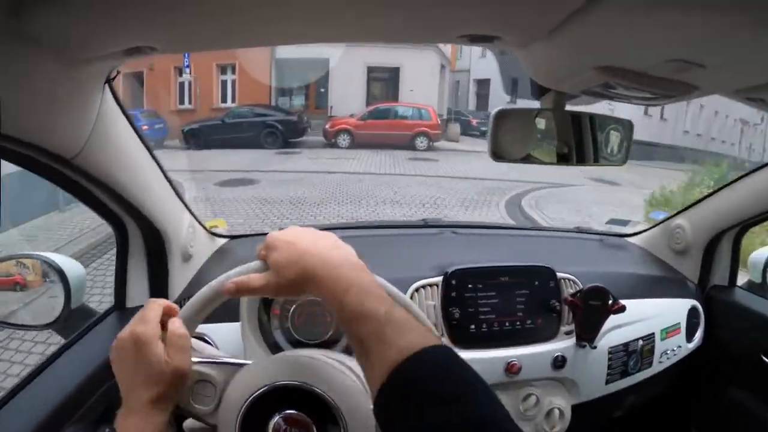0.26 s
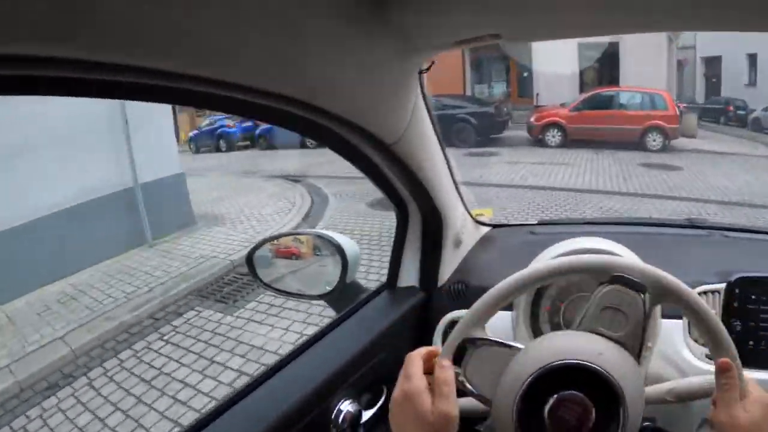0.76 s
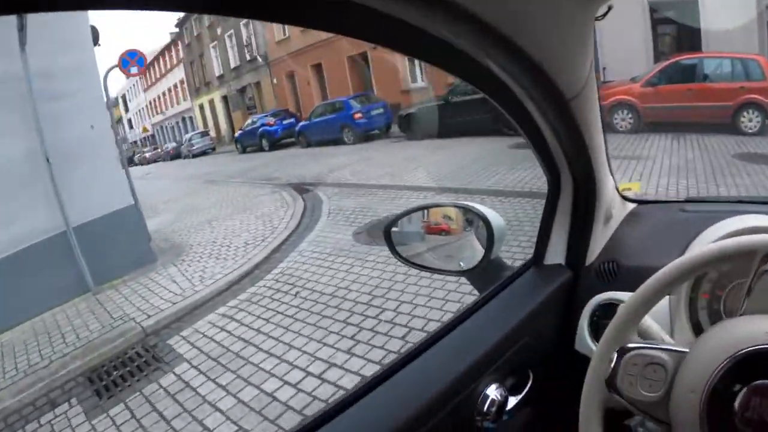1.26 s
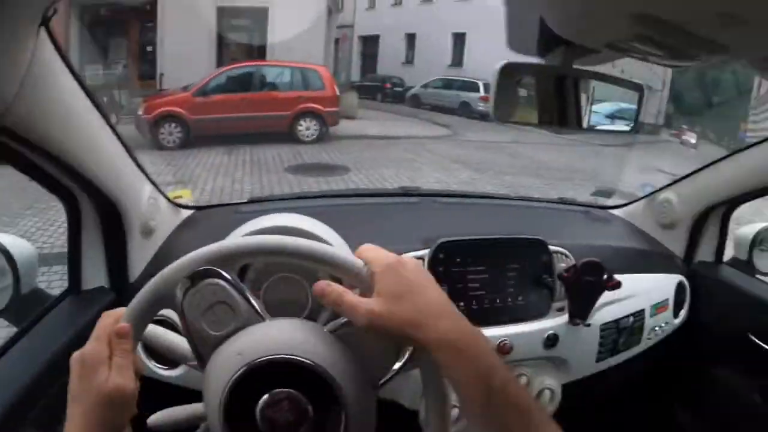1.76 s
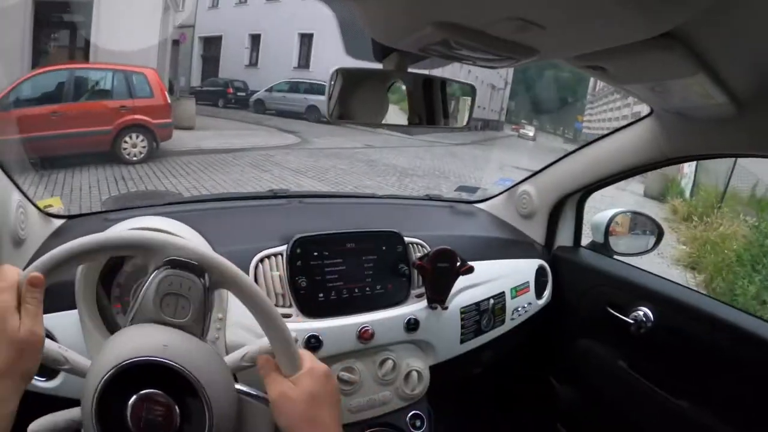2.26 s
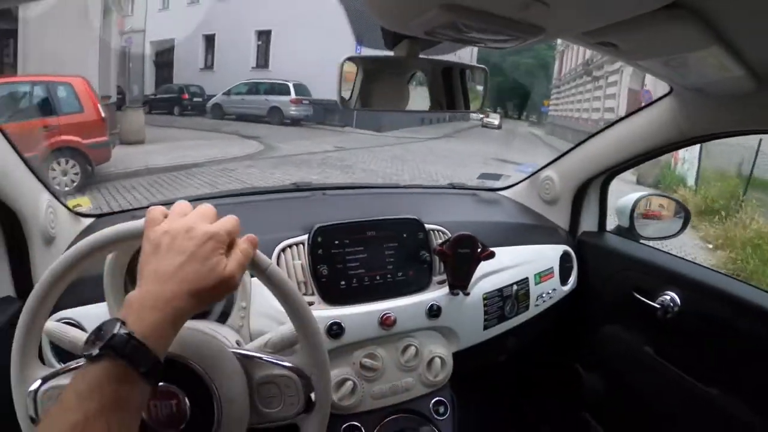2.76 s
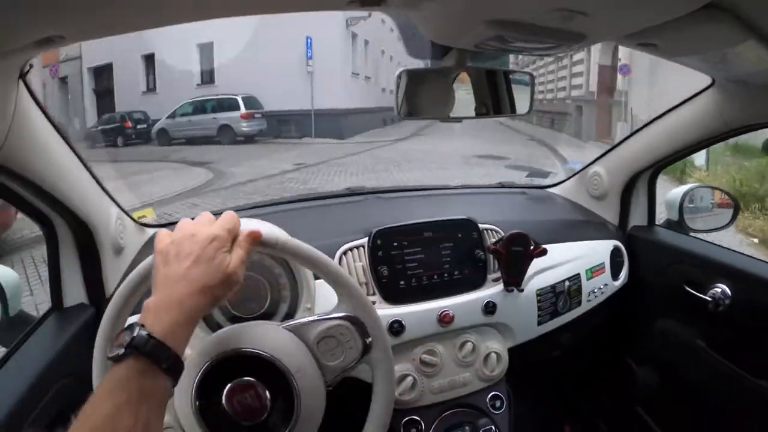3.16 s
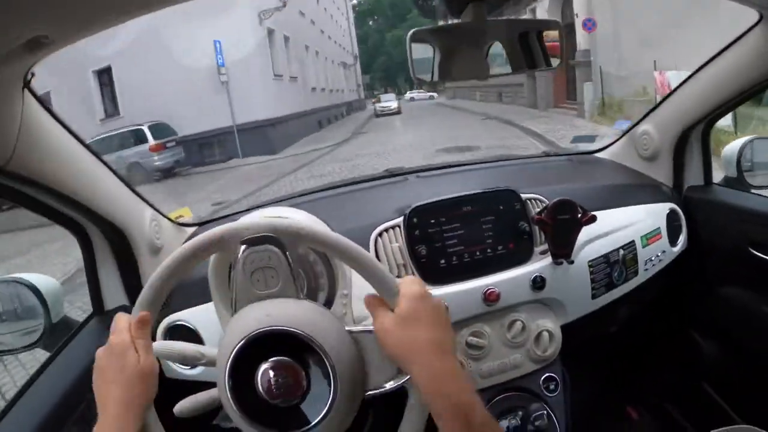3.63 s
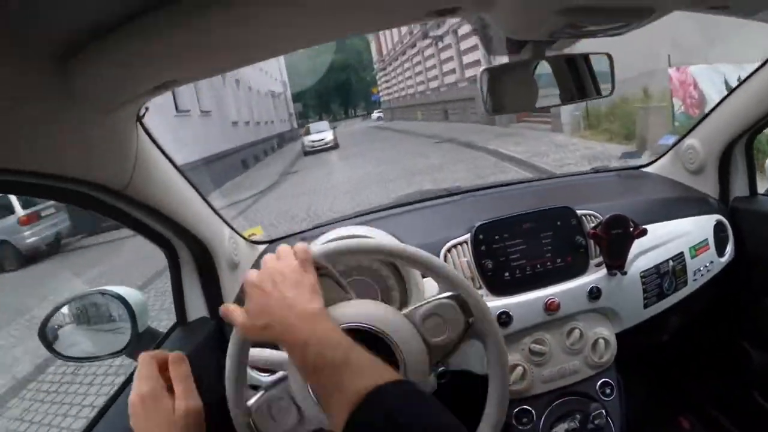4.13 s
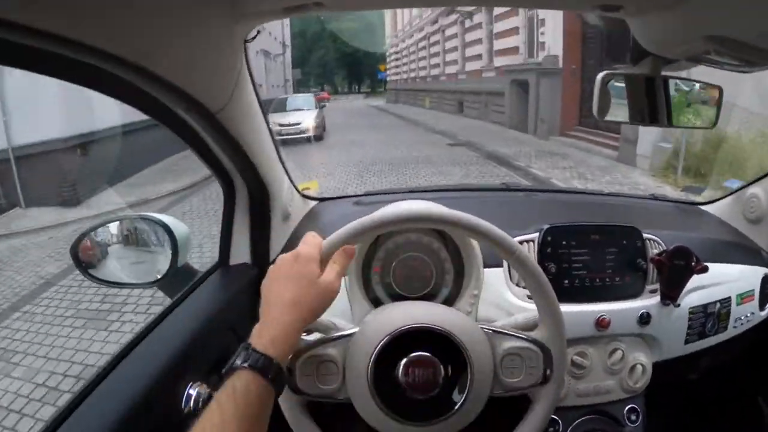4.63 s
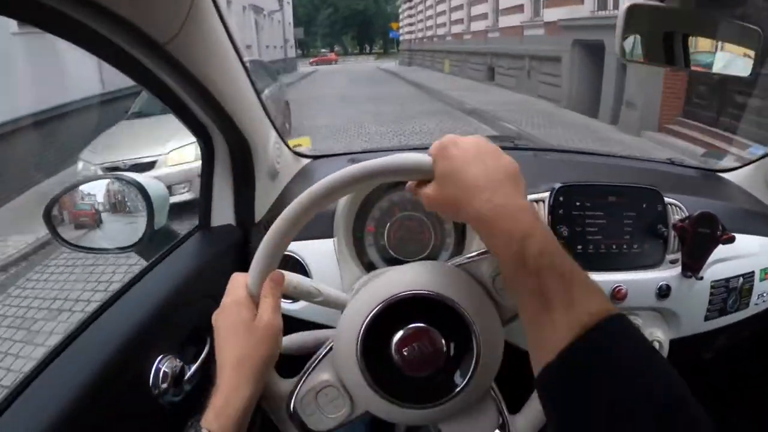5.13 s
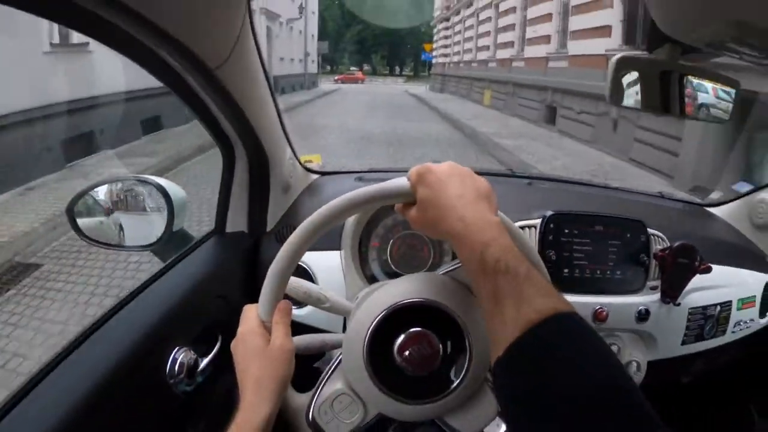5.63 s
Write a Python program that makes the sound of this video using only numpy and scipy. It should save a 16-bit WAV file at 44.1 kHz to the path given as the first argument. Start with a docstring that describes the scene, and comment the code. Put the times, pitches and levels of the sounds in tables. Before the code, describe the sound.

From the driver's seat of a small car, cobbles rumble and drum through floor and doors while the engine drops towards idle. A soft indicator ticks, hands slide and thump the wheel, then the engine surges and climbs with a gear whine. Trim clacks midway; later the revs fall for a gear change and another car rolls past outside. Close, boxy cabin microphone.

```python
"""Small car turning on cobblestones

Inside a small car that slows, turns a corner and pulls away, heard from the driver's seat.
Random jolts from four tyres excite filters: the body booms, the floor and doors drum, the tyres ring.
Sine waves that follow the engine speed make its drone and the gear whine, up to a change of gear.
Decaying tones and bursts of noise make the indicator, stalk, loose trim and knocks on the wheel.
Filtered noise makes the sliding hands, the hiss of the intake and a car passing outside."""
import sys
import numpy as np
from scipy import signal
from scipy.fft import rfft, irfft, next_fast_len
from scipy.io import wavfile
from scipy.ndimage import uniform_filter1d

SR = 44100
rng = np.random.default_rng(int(sys.argv[2]) if len(sys.argv) > 2 else 0)


def wrap_up_sound(samples):
    """Save the sound to the file named by the first command line argument, as 16-bit audio."""
    columns = np.atleast_2d(samples).T
    # keep every value between -1 and 1, then stretch to whole-number steps
    tamed = np.clip(columns, -1, 1)
    steps = np.round(tamed * 32767).astype(np.int16)
    wavfile.write(sys.argv[1], SR, steps)


N = 259749
T = np.arange(N) / SR  # time of every sample (s)
CRUISE_HZ = 60  # firing rate at which the engine levels are stated

# crack of plastic on plastic, also the slap of a palm: pitch_hz, level_db
TRIM_COLOUR = [(400, -43), (720, -5), (900, 2.5), (1100, 1.5), (1250, 4.5), (1500, -2), (1800, 0),
               (2200, -3), (2650, -7.5), (3200, -10.5), (3650, -8.5), (4200, -10.5), (5200, -13.5),
               (6500, -20), (8600, -19.5), (9800, -26.5), (15000, -45.5)]


def undb(db):
    """Turn decibels into a gain."""
    return 10 ** (np.asarray(db) / 20)


def unit(x):
    """Scale a sound to rms 1."""
    return x / np.sqrt(np.mean(x ** 2))


def curves(table):
    """Join the values in each column of a table by straight lines in time."""
    s, *columns = np.transpose(table)
    return [np.interp(T, s, column) for column in columns]


def response(points, hz):
    """Read the gain in dB of a (pitch_hz, level_db) table at a moving pitch."""
    at_hz, db = np.transpose(points)
    return np.interp(np.log(hz), np.log(at_hz), db)


def swells(table, width_s):
    """Add up bell-shaped rises, one for each row of (middle_s, height)."""
    return sum(height * np.exp(-.5 * ((T - s) / width_s) ** 2) for s, height in table)


def walk(rate):
    """Wander slowly at random, with a spread of 1; rate is new random values per second."""
    k = int(SR / rate)
    steps = np.repeat(rng.standard_normal(N // k + 1), k)
    smooth = uniform_filter1d(uniform_filter1d(steps, k), k)
    return unit(smooth[:N])


def steady(x, seconds):
    """Take the slow swells out of a sound by dividing by its running level."""
    return x / np.sqrt(uniform_filter1d(x ** 2, int(seconds * SR)) + 1e-12)


def resonate(x, hz, quality):
    """Pass a sound through one resonance, with gain 1 at its centre."""
    return signal.lfilter(*signal.iirpeak(hz, quality, fs=SR), x)


def colour(x, points, tilt_db=0):
    """Filter through (pitch_hz, level_db) points, tilted by tilt_db per octave, with no pre-echo."""
    size = next_fast_len(len(x) // 2 + 8192) * 2
    octave = np.log2(np.maximum(np.arange(size // 2 + 1) * SR / size, 1))
    hz, db = np.transpose(points)
    at = np.log2(hz)
    # beyond the end points the gain falls 24 dB per octave, for two octaves
    outside = np.clip(np.maximum(at[0] - octave, octave - at[-1]), 0, 2)
    tilt = tilt_db * (np.clip(octave, at[0], at[-1]) - at.mean())
    gain_db = np.interp(octave, at, db) - 24 * outside + tilt
    # folding the cepstrum forward in time gives a filter that reacts only after its input
    cepstrum = irfft(np.log(undb(gain_db)))
    cepstrum[1:size // 2] *= 2
    cepstrum[size // 2 + 1:] = 0
    return irfft(rfft(x, size) * np.exp(rfft(cepstrum)))[:len(x)]


def ring(modes, scatter):
    """Half a second of dying tones from (pitch_hz, level_db, t60_s) rows, retuned a little each time."""
    t = T[:SR // 2]
    out = np.zeros(len(t))
    for k, (hz, db, t60) in enumerate(modes):
        tuned_hz = hz * (1 + scatter * rng.standard_normal())
        # neighbouring modes start in opposite directions
        out += (-1) ** k * undb(db - 60 * t / t60) * np.sin(2 * np.pi * tuned_hz * t)
    return out


def add(out, s, x):
    """Mix the sound x into out at time s."""
    i = int(s * SR)
    out[i:i + len(x)] += x[:N - i]


def by_speed(cruise_db, per_doubling_db):
    """Road noise level in dB: cruise_db at 4 m/s, and more for every doubling of the speed."""
    # speed of the car over the stones: time_s, speed_m_s
    car_speed = [(0, 4.17), (1.1, 2.85), (1.5, 2.79), (2.25, 2.6), (2.5, 4.64), (2.9, 4.48), (3.3, 4.28),
                 (3.65, 4.42), (4.05, 6.8), (4.45, 6.5), (4.8, 4.97), (5.89, 4.56)]
    speed, = curves(car_speed)
    return cruise_db + per_doubling_db * np.log2(np.maximum(speed, .1) / 4)


def by_effort(hz, base_db, per_octave_db, throttle_db):
    """Engine noise level in dB, from base_db at CRUISE_HZ with closed throttle, by revs and throttle."""
    # the accelerator: time_s, throttle (0 to 1)
    pedal = [(0, 0.06), (2.25, 0), (2.7, 0.61), (3.0, 1), (3.45, 0.83), (4.05, 0.92), (4.45, 0.89),
             (5.0, 0.71), (5.45, 0.08), (5.72, 0.93), (5.89, 0.97)]
    throttle, = curves(pedal)
    return base_db + per_octave_db * np.log2(hz / CRUISE_HZ) + throttle_db * throttle


def stones(rate, scatter_db):
    """Four tyres drop into the joints between stones, unevenly and with unequal force."""
    out = np.zeros(N)
    for _ in range(4):
        chance = rng.standard_normal((1000, 2))
        gaps = np.exp(.3 * chance[:, 0]) * SR / rate
        at = np.cumsum(gaps).astype(int)
        out[at[at < N]] += undb(scatter_db * chance[at < N, 1])
    return out - out.mean()


def road(boom_hz=23, cavity_hz=246, stone_rate=44, grit_db=-4, drum_share=0.24):
    """Jolts rock the body, rumble in the springs, drum the panels, ring the tyres and slap the tread."""
    # rumble through the suspension: pitch_hz, level_db
    chassis_colour = [(28, -28.5), (40, 6.5), (58, 5.5), (75, 0.5), (97, 4.5), (112, -0.5), (130, -1.5),
                      (148, -8), (200, -38)]
    # drumming of floor and door panels: pitch_hz, level_db
    panel_colour = [(130, -1.5), (166, 6), (195, -1.5), (220, -2.5), (245, 0.5), (270, -11.5), (305, -5),
                    (350, -10.5), (440, -16), (530, -24), (680, -35), (1200, -54)]
    # tread noise heard through the glass: pitch_hz, level_db
    tread_colour = [(300, 2.5), (520, 3), (720, 1.5), (900, -8), (1150, 1), (1350, -2), (1900, -11),
                    (2700, -19), (3700, -19.5), (5000, -22.5), (8000, -30.5), (14000, -60)]
    # patter of single stones in the wheel arches: pitch_hz, level_db
    patter_colour = [(290, -5.5), (380, 5), (430, -4), (475, -2.5), (560, -11.5), (700, -21.5)]
    # smoother paving across the junction: middle_s, change_db
    smooth_paving = [(1.65, -1), (2.45, -3.5), (3.15, -3)]
    # rougher stretches of cobbles: middle_s, roughness_db (each noise takes its own share)
    rough_paving = [(3.98, 4.8), (4.37, 2.2), (5.72, 5.1)]
    # dips in the road that set the body rocking: peak_s, extra_level_db
    road_dips = [(.65, 6.5), (1.1, 7), (1.58, 8), (4.7, 11.5), (5.33, 8)]

    jolts = stones(rate=stone_rate, scatter_db=1.5)
    # the rubber keeps scrubbing for a moment (11 ms) after each jolt
    scrub = unit(signal.lfilter([1], [1, -np.exp(-1 / (0.011 * SR))], jolts))
    shake = unit(jolts) + rng.standard_normal(N) * undb(2 * scrub + grit_db)

    boom = resonate(colour(jolts, [(19, 0), (27, 0.0052)]), boom_hz, quality=7.6)
    boom = steady(boom, seconds=0.16) * undb(-26.5 + swells(road_dips, width_s=0.17))

    cavity = resonate(resonate(shake, cavity_hz, quality=19), cavity_hz, quality=19)
    cavity = steady(cavity, seconds=0.12)
    rumble = steady(colour(shake, chassis_colour), seconds=0.043)
    drum = steady(colour(shake, panel_colour), seconds=0.46)
    patter = unit(colour(jolts, patter_colour))
    hiss = rng.standard_normal(N) * undb(1.1 * scrub + walk(9))
    tread = unit(colour(hiss, tread_colour))

    # sideways scrub in the corner feeds the rumble and the ring of the air in the tyres
    corner = swells([(0.51, 1)], width_s=0.55)
    rumble = rumble * undb(3.5 * corner)
    cavity = cavity * undb(14 * corner)

    rough_db = swells(rough_paving, width_s=.09)
    drum = drum * undb(drum_share * rough_db)
    patter = patter * undb(2 * rough_db)

    paved = rumble * undb(by_speed(cruise_db=-26.5, per_doubling_db=8.4))
    paved += drum * undb(by_speed(cruise_db=-37.5, per_doubling_db=7.7))
    paved += cavity * undb(by_speed(cruise_db=-53, per_doubling_db=9.2))
    paved *= undb(swells(smooth_paving, width_s=0.4))

    patter = patter * undb(by_speed(cruise_db=-58.5, per_doubling_db=13))
    tread = tread * undb(by_speed(cruise_db=-59.5, per_doubling_db=6.6))
    return boom + paved + patter + tread


def crank():
    """Turn the engine: its firing rate in Hz, and a firing phase that is never quite even."""
    # slowing to idle, pulling away, shifting up: time_s, firing_rate_hz
    firing_rate = [(0, 57.17), (.4, 49.47), (.8, 40.17), (1.2, 35.6), (1.65, 26.45), (2.3, 25.5),
                   (2.5, 40.76), (2.83, 59.07), (3.29, 61.34), (3.53, 67.14), (3.75, 72.46), (4.0, 83.67),
                   (4.3, 91.97), (4.55, 95.78), (4.95, 101.2), (5.1, 101.2), (5.45, 62.99), (5.89, 63.36)]
    hz, = curves(firing_rate)
    uneven_hz = hz * (1 + 0.0062 * walk(26))
    return hz, 2 * np.pi * np.cumsum(uneven_hz) / SR


def engine(hz, phase, rough_db=0.92, rasp_rough_db=4.5, half_order_db=-6, order_db=-2.0):
    """Firings drone in the cabin; multiples of their rate light up as they sweep its resonances."""
    # how the air of the cabin answers the drone: pitch_hz, level_db
    cabin_air = [(26, -1), (35, 2), (44, 2), (58, 0.5), (68, -1.5), (75, -2.5), (84, -14), (94, -2.5),
                 (103, -5.5), (114, -13), (123, -3), (133, -5.5), (145, -27), (168, -13.5), (180, -19.5),
                 (197, -26), (240, -38.5), (300, -37.5)]
    # how the higher multiples reach the cabin: pitch_hz, level_db
    engine_mounts = [(100, -5.5), (145, -9.5), (168, -2.5), (200, -3), (222, -3.5), (248, -6.5), (300, -3),
                     (400, -9), (470, -17), (520, -14.5), (600, -16.5), (720, -26), (1200, -21)]
    # the engine lugs and judders: peak_s, extra_level_db (each part takes its own share)
    judder_peaks = [(.13, 10.5), (.38, 10), (2.48, 7.5), (2.74, 5.5)]
    judder_db = swells(judder_peaks, width_s=0.071)

    # order (multiple of the firing rate), level_db, share of the judder
    drone_parts = [
        (1, by_effort(hz, base_db=-30, per_octave_db=-2.5, throttle_db=12.4), 1),
        (2, by_effort(hz, base_db=-24.5, per_octave_db=7.1, throttle_db=0.47), 0.53),
        (3, by_effort(hz, base_db=-20, per_octave_db=15.2, throttle_db=-13.5), 0.8),
    ]
    drone = 0
    for order, effort_db, share in drone_parts:
        db = effort_db + share * judder_db + response(cabin_air, order * hz)
        drone = drone + undb(db + rough_db * walk(32)) * np.sin(order * phase)

    rasp = 0
    for order in np.arange(2.5, 10, .5):
        db = response(engine_mounts, order * hz) + order_db * (order - 2)
        db = db + half_order_db * (order % 1 > 0)
        # the engine shakes on its mounts, which frays the higher orders more as the revs rise
        shake = .085 * (hz / CRUISE_HZ) ** 2 * walk(50)
        shaken = order * (phase + shake) + rng.uniform(0, 2 * np.pi)
        rasp = rasp + undb(db + rasp_rough_db * walk(14)) * np.sin(shaken)
    rasp_db = by_effort(hz, base_db=-45, per_octave_db=3.7, throttle_db=-0.0013)
    return np.sqrt(2) * (drone + rasp * undb(rasp_db + 0.25 * judder_db))


def gearbox(hz, phase, mesh_order=11.17, hum_order=5.52, whine_db=-3, hum_db=-1.5):
    """Teeth churn in the case; a whine and a lower hum climb with the engine and sing at resonances."""
    # ring of the gearbox case: pitch_hz, level_db
    case_colour = [(350, -8), (450, 3.5), (540, -0.5), (640, -9.5), (740, -16), (830, -0.5), (880, 3.5),
                   (980, 2), (1100, -2.5), (1200, -17), (1450, -9)]
    # how strongly the case radiates a gear tone: pitch_hz, level_db
    case_singing = [(330, -2), (440, -4), (480, -0.5), (520, 1.5), (560, 1), (620, -14), (845, -12),
                    (885, 12.5), (935, -8), (1000, -9), (1040, 1), (1070, -3), (1105, -12)]
    level_db = by_effort(hz, base_db=-71.5, per_octave_db=0.93, throttle_db=18.95)
    throbbing = rng.standard_normal(N) * (1 + 0.22 * np.sin(phase))
    churn = unit(colour(throbbing, case_colour))
    tones = 0
    for order, db in [(mesh_order, whine_db), (hum_order, hum_db)]:
        waver = .65 * walk(34)  # drift of the phase (radians)
        tone_db = db + response(case_singing, order * hz) + 3.5 * walk(16)
        tones = tones + np.sin(order * phase + waver) * undb(tone_db)
    return undb(level_db) * (churn + np.sqrt(2) * tones)


def intake(hz, phase, throb=0.24):
    """Air hisses into the engine, throbbing with the firings and growing with the throttle."""
    # hiss of the intake: pitch_hz, level_db
    intake_colour = [(1400, 1.5), (2000, -3.5), (2800, -1.5), (3700, -1.5), (5000, -13.5), (8000, -20.5)]
    air = rng.standard_normal(N) * (1 + throb * np.sin(phase))
    level_db = by_effort(hz, base_db=-78, per_octave_db=3, throttle_db=6.35)
    return unit(colour(air, intake_colour)) * undb(level_db)


def knocks(slap_db=-23, slap_s=0.025):
    """A hand lands on the wheel: the palm slaps and the column rings; a longer push is duller."""
    # knocks on the steering wheel: start_s, peak_level_db, push_length_s
    wheel_knocks = [(1.8872, -22, 0.0021), (1.902, -17, 0.0004), (1.917, -16, 0.003), (2.070, -25, 0.0012)]
    # modes of wheel and column: pitch_hz, level_db, t60_s (time to die away by 60 dB)
    wheel_modes = [(119.3, 0, 0.69), (138.75, 6.5, 0.11), (172, -2.5, 0.19), (217, 4, 0.033),
                   (306, -9.5, 0.12), (396, -9, 0.16), (489, -7, 0.057), (532, -6, 0.034),
                   (946, -3.5, 0.05), (1067, 6, 0.015), (1116, -2.5, 0.07), (2280, -21, .035)]
    out, t = np.zeros(N), T[:SR // 2]
    for s, db, push_s in wheel_knocks:
        push = np.hanning(int(push_s * SR) + 3)
        slap = colour(rng.standard_normal(len(t)) * np.exp(-t / slap_s), TRIM_COLOUR)
        slap = slap / slap[:SR // 100].std()
        body = ring(wheel_modes, scatter=0.013)
        blow = body / np.abs(body).max() + undb(slap_db) * slap
        thud = np.convolve(blow, push)[:len(t)]
        add(out, s, thud / np.abs(thud).max() * undb(db))
    return out


def clicks(table, modes, rebound_db, tail_s, tail_db, snap_s=0.0007):
    """Plastic slips and cracks, springs back once, rings, and leaves a brief wash of reflections."""
    out, t = np.zeros(N), T[:SR // 2]
    slip = np.minimum(t / .002, 1) ** 2
    snap = slip * (np.exp(-t / snap_s) + undb(tail_db) * np.exp(-t / tail_s))
    rebound = undb(rebound_db) * np.interp(t - 0.0042, t, snap)  # 4.2 ms later
    shape = np.hypot(snap, rebound)
    for s, db, tilt_db, low_hz, ring_db in table:
        crack = colour(rng.standard_normal(len(t)) * shape, TRIM_COLOUR, tilt_db)
        tilted = [(hz, gain_db + tilt_db * np.log2(hz / low_hz), t60) for hz, gain_db, t60 in modes]
        body = slip * ring(tilted, scatter=.008)
        low_cut = signal.butter(4, low_hz, "high", fs=SR, output="sos")
        click = signal.sosfilt(low_cut, unit(crack) + undb(ring_db) * unit(body))
        add(out, s, click / np.abs(click).max() * undb(db))
    return out


def loose_trim():
    """Loose trim clacks: plastic strikes plastic and a loose panel rings."""
    # clacks: start_s, peak_level_db, brightness_db_per_octave, low_cut_hz, panel_ring_db
    clacks = [(1.7405, -45, -1, 1200, -9), (1.890, -37, -15, 1700, 2), (1.907, -36.5, 1.5, 1900, -8),
              (2.057, -43, -6.5, 1301, -3), (3.3435, -44, 1, 896.4, 1.5), (3.405, -37.5, -1.5, 495, -0.5),
              (3.412, -31.5, -6.5, 500, -4.5), (3.418, -33.5, -2.5, 1390, 0.5), (3.422, -26, -6, 452, 7.5),
              (3.446, -32, -1.5, 670.2, 2.5), (3.473, -38.5, -2.5, 754, 0.5), (3.486, -42, 3, 895, 4),
              (4.886, -42.5, -0.5, 1210, -7)]
    # modes of the loose panel: pitch_hz, level_db, t60_s
    loose_panel_modes = [(543, -14.5, 0.1), (878, 1, 0.04), (1150, 1, 0.019), (1215, -7, 0.016),
                         (1590, -7.5, 0.05), (2110, -7, 0.031), (3550, -15, 0.021), (4130, -26, 0.014)]
    return clicks(clacks, loose_panel_modes, rebound_db=-8, tail_s=.013, tail_db=-14)


def stalk():
    """The indicator stalk catches on its cam: a crack of plastic and the ring of the stalk."""
    # catches: start_s, peak_level_db, brightness_db_per_octave, low_cut_hz, stalk_ring_db
    catches = [(0.6445, -33, 0, 1110, -2), (0.650, -36.5, 0.5, 1230, 2), (2.7405, -33.5, -0.5, 796.4, 3),
               (2.751, -42, -2.5, 2220, 0)]
    # modes of the stalk: pitch_hz, level_db, t60_s
    stalk_modes = [(1240, -2.5, .03), (1490, 11.5, 0.035), (1597, 6, 0.038), (2016, 0.5, 0.026),
                   (2300, 0.5, 0.03), (2740, -1, 0.028), (3060, -1, 0.059), (3560, 2, 0.03),
                   (4760, -11.5, 0.032), (8300, -6, 0.022), (8900, -11.5, 0.025)]
    return clicks(catches, stalk_modes, rebound_db=-7, tail_s=.01, tail_db=-13)


def spring():
    """The plucked return spring of the stalk sings briefly on one dying tone."""
    # plucks: start_s, level_db
    plucks = [(2.693, -57), (2.753, -57)]
    # mode of the spring: pitch_hz, level_db, t60_s
    spring_mode = [(3600, 0, 0.12)]
    out = np.zeros(N)
    for s, db in plucks:
        add(out, s, ring(spring_mode, scatter=0.003) * undb(db))
    return out


def indicator(lift_db=0.5):
    """A ticker behind the dials clicks softly: each tick swells in quickly, rings and fades."""
    # ticks, about three a second: time_s, level_db (before the lift they all share)
    tick_times = [(0.283, -57.5), (.618, -71), (0.94, -58), (1.262, -59), (1.602, -59), (1.921, -60),
                  (2.261, -52.5), (2.601, -56.5), (2.923, -54), (3.242, -61)]
    # modes of the ticker: pitch_hz, level_db, t60_s
    ticker_modes = [(1860, -8, 0.011), (1965, 3.5, 0.007), (3665, -1.5, 0.008), (3856, 1, 0.0063),
                    (3765, 1, 0.0044), (5400, -13, 0.005)]
    onset_s, lead_s, hold_s, fade_s, rise_s = .01, .002, .002, .008, .005
    out, t = np.zeros(N), T[:SR // 16]
    # a spray of noise swells in up to the onset, holds briefly and fades like reflections
    swell_in = (t - onset_s) / lead_s
    fade = (onset_s + hold_s - t) / fade_s
    spray = np.exp(np.minimum(0, np.minimum(swell_in, fade)))
    rise = np.sin(np.pi / 2 * np.minimum(t / rise_s, 1)) ** 2
    for s, db in tick_times:
        paths = rng.standard_normal(len(t)) * spray
        tick = 0
        for hz, gain_db, t60 in ticker_modes:
            mode = ring([(hz, 0, t60)], scatter=.012)[:len(t)] * rise
            sprayed = signal.fftconvolve(mode, paths)[:len(t)]
            tick = tick + undb(gain_db) * unit(sprayed)
        # start early, so that the tick has swelled in by about the listed time
        add(out, s - onset_s - rise_s / 2, unit(tick) * undb(db + lift_db))
    return out


def hands(grain_db=1.2, grip_db=1):
    """Skin slides over the rim: each stroke is a swell of tiny slips."""
    # strokes of hand and sleeve: peak_s, level_db, width_s, brightness_db_per_octave
    strokes = [(.378, -63, 0.032, -9.5), (0.559, -70, 0.071, 6), (.627, -59, 0.015, -5),
               (0.752, -68.5, 0.021, 1.5), (1.221, -67, 0.12, -2.5), (1.484, -68.5, 0.022, 1),
               (1.829, -62, 0.06, -0.5), (1.919, -57, 0.034, 0.5), (2.319, -60, 0.16, 0),
               (3.851, -66, 0.12, -4), (4.071, -65, 0.045, -3), (4.4, -63, 0.12, -6.5),
               (4.633, -62.5, 0.07, 2), (4.72, -63, 0.09, -2.5), (5.119, -63, 0.071, 2.5),
               (5.72, -63, 0.017, -8.5)]
    # colour of skin on the rim: pitch_hz, level_db
    skin_colour = [(600, -19.5), (1200, -12), (2000, 3), (2900, 2.5), (4200, 3.5), (5500, 3), (8500, 1.5),
                   (10000, -3.5), (12500, -9), (15000, -25)]
    slips = rng.standard_normal(N) * undb(grain_db * walk(300) + grip_db * walk(45))
    out = np.zeros(N)
    for s, db, width_s, tilt_db in strokes:
        span = np.abs(T - s) < 3 * width_s
        swell = np.exp(-.5 * ((T[span] - s) / width_s) ** 2)
        out[span] += unit(colour(slips[span], skin_colour, tilt_db)) * swell * undb(db)
    return out


def oncoming():
    """The tyres of another car roll by outside: filtered noise that swells and fades."""
    # colour of its tyres: pitch_hz, level_db
    passing_colour = [(600, -3.5), (780, 1.5), (950, 3), (1150, -2), (1500, -17)]
    tyres = unit(colour(rng.standard_normal(N), passing_colour))
    return tyres * undb(-55.5) * swells([(5.64, 1)], width_s=0.35)


def scene():
    """Mix everything as heard from the driver's seat."""
    hz, phase = crank()
    car = road() + engine(hz, phase) + gearbox(hz, phase) + intake(hz, phase)
    handling = knocks() + stalk() + spring() + indicator() + hands()
    return (car + handling + loose_trim() + oncoming())[None]


def record(dry):
    """Cut the top above 15 kHz, with 6 ms fades so the sound starts and stops without a click."""
    fade = np.minimum(np.minimum(T, T[-1] - T) / .006, 1)
    faded = dry * np.sin(np.pi / 2 * fade) ** 2
    top_cut = signal.ellip(8, .2, 70, 15000, fs=SR, output="sos")
    return signal.sosfilt(top_cut, faded)


dry = scene()
out = record(dry)
wrap_up_sound(out)
```